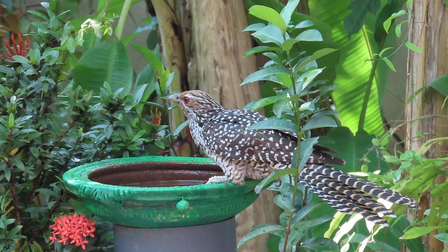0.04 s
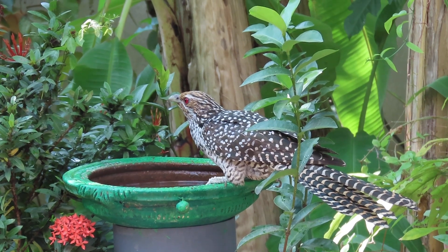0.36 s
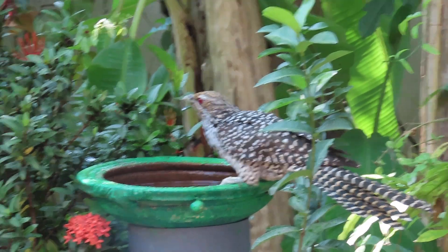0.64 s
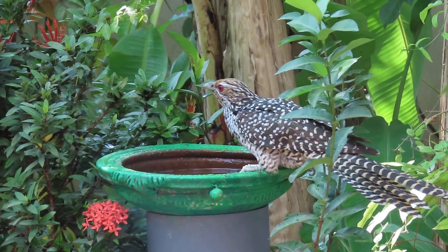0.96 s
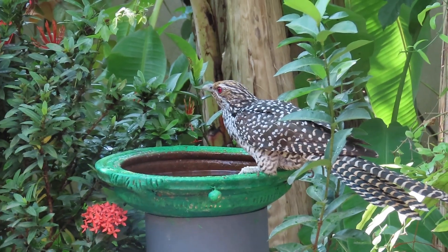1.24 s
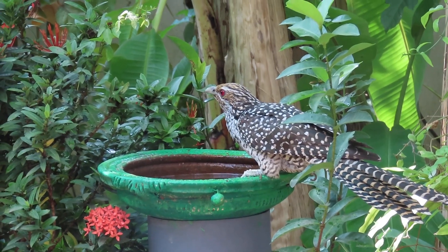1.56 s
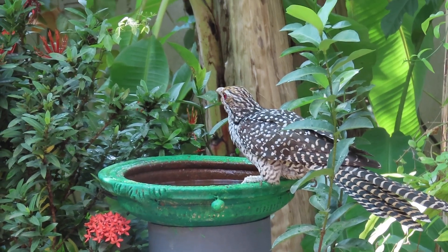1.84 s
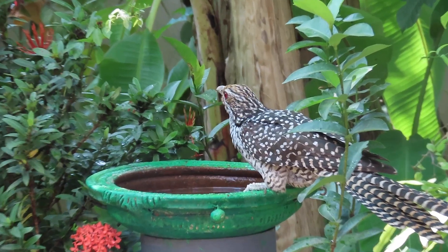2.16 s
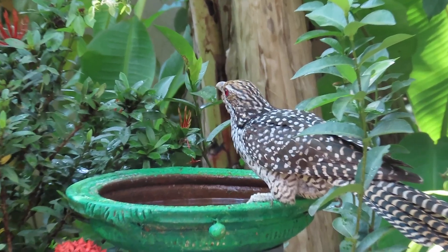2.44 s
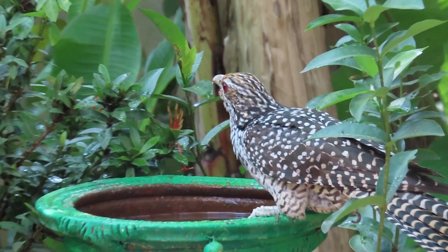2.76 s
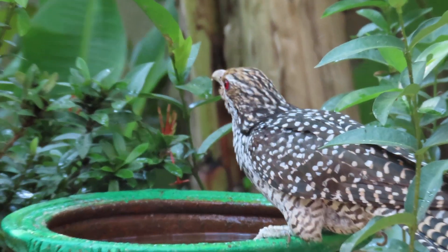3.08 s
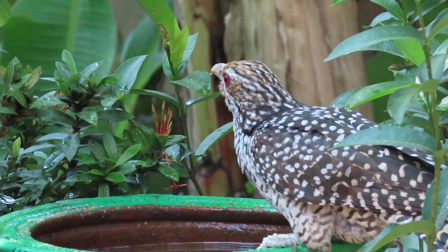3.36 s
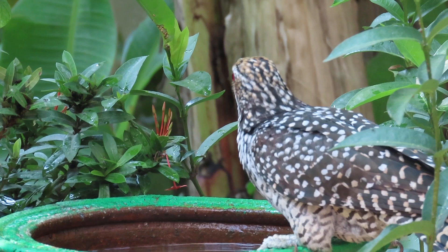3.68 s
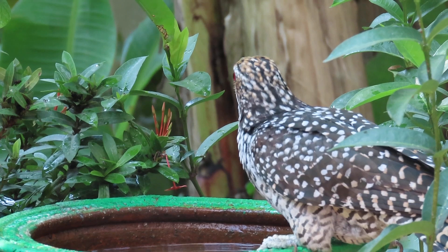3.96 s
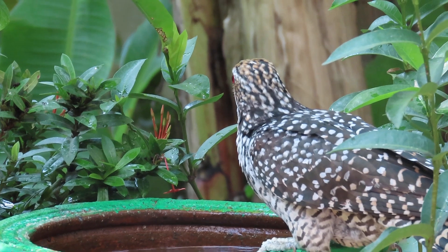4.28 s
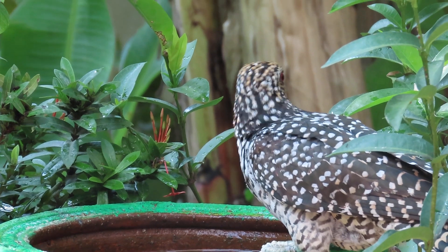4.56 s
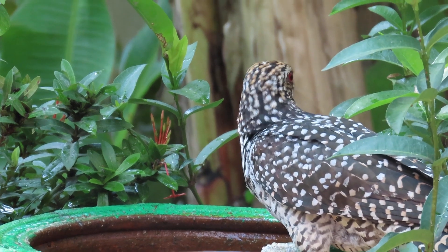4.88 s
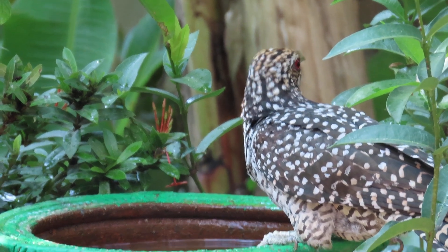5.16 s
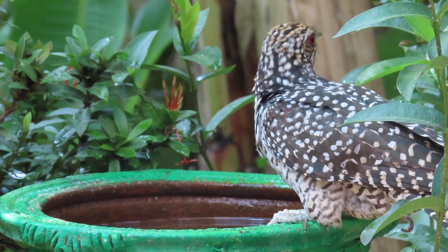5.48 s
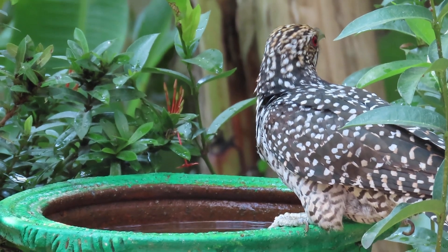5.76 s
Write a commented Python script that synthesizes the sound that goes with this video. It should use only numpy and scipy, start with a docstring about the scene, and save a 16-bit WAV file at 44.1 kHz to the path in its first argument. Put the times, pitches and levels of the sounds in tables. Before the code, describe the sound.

Over the low rumble of a far-off town, a nearby bird lets out a quick series of six raspy, high squawks, followed by three rougher croaks that slide downward. In the pause that follows, there are light ticks and rustles of foliage and a very faint, brief whine from a camera lens motor. Three more squawks come at the end, echoing slightly around the garden.

```python
"""In a walled garden, a koel on a bird bath squawks six times, croaks three times, pauses and calls again.
Each squawk is a rough whistle from the two sides of the syrinx, with a rasp of turbulent air; in the
croaks the vibration turns hoarse and slides down through the throat's resonances. The walls echo.
Foliage ticks and rustles, a distant town rumbles throughout, and a lens motor briefly whines."""
import sys
import numpy as np
from scipy import signal
from scipy.fft import rfft, irfft
from scipy.io import wavfile

SR = 44100
rng = np.random.default_rng(int(sys.argv[2]) if len(sys.argv) > 2 else 0)


def dump_mix(stems):
    """Bounce the given channels to the path in sys.argv[1] as a 16-bit WAV at rate SR."""
    frames = np.atleast_2d(stems).T  # one column per channel
    limited = np.clip(frames, -1, 1)  # hard clip at full scale
    pcm = np.round(limited * 32767).astype(np.int16)
    wavfile.write(sys.argv[1], SR, pcm)


N = 261072
TIME, FREQ = np.arange(N) / SR, np.maximum(np.arange(N // 2 + 1) * SR / N, 1)
# Spectrum of air rushing through the throat. Each row: frequency in Hz, relative level in dB.
BREATH_SPECTRUM = [(1200, -15), (1900, 16), (2250, 15), (2550, 3), (3100, 1), (4000, 5), (4550, 12),
                   (5050, 4), (5800, 7), (6700, -1.5), (7300, -1), (8100, -2), (9200, -25), (11500, -4.5),
                   (13200, -8), (15000, -27)]
# Resonances of the foliage. Each row: centre in Hz, width in Hz, relative level in dB.
FOLIAGE_MODES = [(2430, 700, 11), (3210, 450, 3.5), (3746, 520, 5), (5120, 1350, 0), (7400, 1500, -15)]


def squawks(buzz_hz=135, jitter=.0135, onset_db=11, second_ratio=.9):
    """Self-sustained oscillation: the syrinx whistles, and a slower buzz modulates level and pitch."""
    # Each row: start, end and attack in seconds, crest pitch in Hz, its fall as a share, relative crest
    # level and sag in dB, trims of fundamental, overtones and rasp in dB, line spread in Hz,
    # level of the second side of the syrinx in dB.
    calls = [(0.692, 0.808, 0.039, 2197, 0.06, -35, 4.5, 2, 7.5, -8, 190.4, -8),
             (0.932, 1.038, 0.041, 2237, 0.04, -30.5, 5.5, -3, 0, -4, 190, -9),
             (1.145, 1.254, 0.049, 2186, 0.08, -33.5, 6, -3.5, 4.5, 1.5, 221.3, -6),
             (1.364, 1.491, 0.046, 2203, 0.04, -30.5, 2.5, -3, 1.5, -1.5, 209.7, -9),
             (1.776, 1.899, 0.05, 2239, 0.08, -28.5, 5, -2.5, 2, -9.5, 199.9, -12),
             (2.03, 2.186, 0.019, 2117, 0.04, -37.5, -1, -5, 0, -10.5, 120.4, -12),
             (5.122, 5.224, 0.04, 2152, 0.07, -29.5, 7, -1.5, -3, -9.5, 209.8, -9),
             (5.353, 5.467, 0.035, 1904, 0.01, -38.5, 7, -0.5, 0, -9, 110, -8),
             (5.538, 5.676, 0.034, 2123, 0.05, -28.5, 8.5, -3.5, -1.5, -15.5, 189.7, -12.5)]
    # Harmonics above the octave. Each row: multiple of the pitch, level against the octave in dB.
    overtones = [(3, -19.5), (4, -36.5), (5, -32), (6, -34)]
    progress, sounding, held = call_controls(calls)
    _, crest_hz, fall, _, _, low_db, bright_db, air_db, spread_hz, second_db = held
    effort_db, = curves([point for start, end, attack, _, _, db, sag, *_ in calls
                         for point in [(start, db - onset_db), (start + attack, db), (end, db - sag)]])
    gape = np.sin(np.pi * progress)
    buzz = np.sin(phase_of(buzz_hz * (1 + .192 * wander(46.3))))
    phase = phase_of(pitch_arch(progress, crest_hz, fall) * (1 + jitter * wander(180) + .012 * buzz))
    # the fundamental fades under the octave; overtones are brightest while the bill is wide
    fundamental = [(1, low_db - 6 * (progress - .5))]
    upper = [(2, 0)] + [(k, db + bright_db + 5 * (gape - .5)) for k, db in overtones]
    voice = rough_voice(phase, fundamental, spread_hz, chaos=.6)
    voice += rough_voice(phase, upper, 1.1 * spread_hz, chaos=.78)
    # the other side of the syrinx sings a little lower
    second_side = rough_voice(second_ratio * phase, fundamental + upper[:2], spread_hz, chaos=.99)
    whistle = (voice + undb(second_db) * second_side) * unit(1 + .3 * buzz)
    rasp = undb(air_db - .5 + 4 * (progress - .5)) * noise(undb(across(BREATH_SPECTRUM)))
    hiss = undb(air_db / 2 - 22) * gape * noise_band(11800, 3100)
    return (whistle + (rasp + hiss) * puffs()) * undb(effort_db - 3) * sounding


def croaks(attack_s=.03, onset_db=8, jitter=.036, drop_share=.176):
    """Source and filter: hoarse harmonics fall through fixed resonances while puffs ring the gullet."""
    # Each row: start and end in seconds, relative level and sag in dB, upper and lower pitch in Hz,
    # moment of the drop as a share of the call, trims of gullet and rasp in dB.
    calls = [(2.286, 2.424, -33.5, 8, 2038, 1787, 0.54, -7, -8),
             (2.516, 2.661, -35, 12.5, 1891, 1314, 0.52, -2, -7),
             (2.817, 3.007, -38.5, 8, 1636, 1233, 0.42, -5, -8)]
    # Response of the throat in a croak. Each row: frequency in Hz, gain in dB.
    throat = [(1000, -12), (1400, -2.5), (1850, -1), (2500, 4), (3300, 0), (3800, -2.5), (4300, 2.5),
              (4800, -4), (5400, -9.5), (5900, -19), (6800, -12), (7400, -21), (8500, -50), (9700, -35),
              (11300, -21.5), (13000, -33), (15000, -45)]
    # Resonances that ring as the voice breaks up. Each row: centre in Hz, width in Hz, gain in dB.
    gullet_modes = [(3340, 330, 1.5), (4280, 190, 6.5), (4670, 180, 2), (6500, 290, -7.5)]
    progress, sounding, (_, _, high_hz, low_hz, drop_at, gullet_db, air_db) = call_controls(calls)
    effort_db, = curves([point for start, end, db, sag, *_ in calls
                         for point in [(start, db - onset_db), (start + attack_s, db), (end, db - sag)]])
    dropped = .5 + .5 * np.tanh((progress - drop_at) / drop_share)
    pitch_hz = (high_hz + (low_hz - high_hz) * dropped) * (1 + jitter * wander(180))
    harmonics = [(k, 0) for k in range(1, 9)]
    source = rough_voice(phase_of(pitch_hz), harmonics, spread_hz=205, chaos=.92)
    voice = shape(source, undb(across(throat)))
    air = rng.standard_normal(N) * puffs()
    gullet = undb(gullet_db + 3 * (progress + .5)) * unit(shape(air, resonances(gullet_modes)))
    rasp_colour = undb(across(BREATH_SPECTRUM)) * np.sqrt(low_pass(8500))
    rasp = undb(air_db) * unit(shape(air, rasp_colour))
    # an upper resonance of the throat sinks and grows through each croak
    sinking_hz = np.interp(progress, [0, 1], [5250, 4530])
    sinking = undb(-3.5) * progress * moving_resonance(air, sinking_hz, width_hz=390)
    return (voice + sinking + gullet + rasp) * undb(effort_db - 3) * sounding


def rough_voice(phase, partials, spread_hz, chaos):
    """Random modulation: chaos (0-1) broadens the harmonics (multiple, dB) from lines into bands."""
    wander_hz = 500
    warped_time = np.cumsum(np.broadcast_to(spread_hz / wander_hz, N)) / SR
    sidebands = np.interp(warped_time, TIME, wander(wander_hz) + 1j * wander(wander_hz))
    stack = sum(undb(db) * np.exp(1j * round(k) * phase) for k, db in partials)
    return np.imag(stack * (np.sqrt(2 * (1 - chaos ** 2)) + chaos * sidebands))


def pitch_arch(progress, crest_hz, fall, crest_at=.42, scoop=.042):
    """Frequency glide: the pitch scoops up to a rounded crest, then falls steadily."""
    before = np.maximum(1 - progress / crest_at, 0)
    after = np.maximum(progress - crest_at, 0) / (1 - crest_at)
    return crest_hz * (1 - scoop * before ** 2 - fall * after)


def puffs(rate_hz=210, scatter=.35, depth=.65):
    """Amplitude modulation: the slack folds of the syrinx chop the air unevenly."""
    return unit(1 + depth * np.sin(phase_of(rate_hz * (1 + scatter * wander(91)))))


def moving_resonance(x, hz, width_hz):
    """Forced resonance: x drives a narrow band whose centre moves; rms 1."""
    carrier = np.exp(1j * phase_of(hz))
    narrow = signal.butter(2, width_hz / 2, fs=SR, output="sos")
    return unit(np.real(carrier * signal.sosfilt(narrow, x / carrier)))


def call_controls(calls, release_s=.012):
    """Breath gates the voice: gives each call's progress (0-1), its envelope and its held settings."""
    progress, = curves([point for start, end, *_ in calls
                        for point in [(start - .01, 0), (start, 0), (end, 1), (end + .06, 1)]])
    sounding = np.max([gate(start, end, rise=.0058, fall=release_s) for start, end, *_ in calls], axis=0)
    held = curves([(t, *row) for start, end, *row in calls for t in (start - .01, end + .06)])
    return progress, sounding, held


def foliage_knocks(faint_count=30):
    """Impacts in the foliage: clear ones at set times, faint ones scattered at random."""
    # Each row: time in seconds, relative levels of body and treble in dB.
    clear = [(0.3198, -33.5, -74), (0.359, -28, -65), (0.6397, -31.5, -63), (0.9085, -29, -69),
             (1.72, -30.5, -74), (1.7737, -29, -67), (2.142, -29.5, -62), (3.2, -38.5, -74),
             (3.26, -37.5, -72), (3.469, -34, -61), (3.5097, -33.5, -65), (3.587, -31, -64),
             (3.7788, -31.5, -70), (3.8451, -38, -71), (3.8786, -43, -71), (4.07, -30, -59),
             (4.3375, -32.5, -70), (4.378, -32, -69), (4.4702, -43, -69), (4.4942, -37.5, -67),
             (4.628, -33.5, -73), (4.6693, -37, -72), (4.6992, -39, -59), (4.7256, -38, -68),
             (4.7615, -36.5, -71), (4.862, -35, -76), (4.8883, -30.5, -63), (4.9714, -37.5, -59),
             (5.0712, -33, -88), (5.8152, -32.5, -73)]
    times = rng.uniform(0, N / SR, (faint_count, 1))
    levels_db = [-42, -70] + 1.5 * rng.standard_normal((faint_count, 2))
    return np.vstack([clear, np.hstack([times, levels_db])])


def ticks(knocks, hold_s=.006):
    """Impact excitation: each knock stirs the foliage's modes in its own proportions."""
    stir = undb(1.5 * rng.standard_normal((len(knocks), len(FOLIAGE_MODES))))
    blows = np.array([undb(db) * gate(t, t + hold_s, rise=.0017, fall=.012) for t, db, _ in knocks])
    rings = np.array([undb(db) * noise_band(hz, width) for hz, width, db in FOLIAGE_MODES])
    return undb(-10) * np.sum((stir.T @ blows) * rings, axis=0) / np.std(rings.sum(axis=0))


def snaps(knocks):
    """A brief impact is broadband: the thin top of each tick, different left and right."""
    bursts = sum(undb(db) * gate(t, t + .001, rise=.001, fall=.011) for t, _, db in knocks)
    return bursts * np.array([noise_band(11100, 9700) for _ in range(2)])


def rustle(patchy_db=2.2):
    """Friction noise: leaves brush in soft, uneven patches."""
    # Each row: time in seconds, relative level in dB.
    brushing = [(0, -69), (.28, -57), (.36, -53.5), (.5, -64), (1.6, -50), (2.2, -54), (3.4, -69),
                (3.5, -52), (3.7, -81), (3.83, -54), (4, -82), (4.3, -68), (4.42, -68), (4.57, -67),
                (4.75, -64), (4.95, -58), (5.05, -67), (5.9, -53.5)]
    level_db, = curves(brushing)
    return undb(level_db - 1 + patchy_db * wander(30)) * noise(resonances(FOLIAGE_MODES))


def garden(x, t60_s=.56, tail_db=-8, damp_hz=7500):
    """Reflection and scattering: direct sound, hard echoes and a duller diffuse tail, in stereo."""
    # Colour of the diffuse tail. Each row: frequency in Hz, gain in dB.
    tail_colour = [(1000, 2), (2100, -1.5), (3000, -1.5), (4450, 1), (5200, -2), (7000, -4), (12000, -10)]
    # Reflections from trunks and walls. Each row: delay in seconds, gain in dB.
    echoes = [(.0075, -5.5), (.023, -5.5), (.071, -7.5), (.135, -13)]
    # Phase between the microphone ports. Each row: frequency in Hz, lead of the left in radians.
    port_phase = [(1000, 0), (4400, .25), (6500, .5), (9000, .6), (11500, 1.9), (15000, 2.8)]
    decay = undb(tail_db) * unit((1 - np.exp(-TIME / .0004)) * undb(-60 * TIME / t60_s))
    tail_mid, tail_side = rfft(rng.standard_normal((2, N)) * decay / np.sqrt(N))
    reflections = sum(undb(db) * np.exp(-2j * np.pi * FREQ * delay) for delay, db in echoes)
    # leaves absorb the treble; the ports differ more as waves get shorter
    damping = np.sqrt(low_pass(damp_hz))
    mid = 1 + damping * (tail_mid * undb(across(tail_colour)) + reflections)
    side = damping * tail_side * np.minimum(FREQ / 4200, 1.3)
    turn = np.exp(.5j * across(port_phase))
    responses = irfft([mid * turn + side, mid / turn - side], N)
    lead = 64  # samples of room for the earlier arrival
    responses = np.roll(responses, lead, axis=1)[:, :SR]
    return signal.fftconvolve(x[None], responses, axes=1)[:, lead:lead + N]


def town(level_db=-38, low_hz=70, upper_hz=800):
    """Superposition: far sources merge into a broad rumble, with the drones of machines in it."""
    # Spectrum of the rumble. Each row: frequency in Hz, relative spectral density in dB.
    spectrum = [(15, -35), (25, -23), (53, -9), (75, -3.5), (101, -12), (160, -1.5), (240, -2.5), (305, -3),
                (648, -10), (919, -9), (1750, -16.5), (3830, -27.5), (4500, -31.5), (5010, -34.5),
                (15500, -53.5)]
    # Stereo width. Each row: frequency in Hz, side minus mid in dB.
    stereo_width = [(60, -26), (110, -14), (200, -17.5), (380, -13), (700, -15.5), (1290, -15.5),
                    (2380, -8.5), (4400, -9), (8120, -3.5), (15000, 2)]
    # Drones of far machines. Each row: centre in Hz, width in Hz, relative level in dB.
    machines = [(43.7, 5.3, -50.5), (110.7, 16, -48.5), (167.3, 42, -48.5), (349, 145, -45),
                (494.2, 11.4, -54.5), (918.6, 30, -53.5)]
    mid, side = (undb(level_db) * noise(undb(across(spectrum))) for _ in range(2))
    side = shape(side, undb(across(stereo_width)))
    stereo = np.array([mid + side, mid - side])
    low = low_pass(low_hz)
    upper = (1 - low_pass(upper_hz)) * low_pass(5000)
    gains = background_levels()
    rumble = sum(shape(stereo, band) * gain for band, gain in zip([low, 1 - low - upper, upper], gains))
    drones = sum(undb(db) * noise_band(hz, width) * gains[int(hz > low_hz)] for hz, width, db in machines)
    return rumble + drones


def background_levels(drop_from_s=2.23, drop_to_s=3.44, flicker_db=.5):
    """Gains of three bands: the low rumble swells; the upper background drops as the camera zooms."""
    # Swell of the low rumble. Each row: time in seconds, gain in dB.
    low_swell = [(0, 2.5), (2.3, 1.5), (3.3, 6.5), (4.1, 1.5), (4.6, 4), (5.9, 4.5)]
    low_db, = curves(low_swell)
    # the camera's noise suppression, as a cut at set times
    cut_db, = curves([(drop_from_s - .05, 0), (drop_from_s, -5), (drop_to_s, -5), (drop_to_s + .05, 0)])
    return [undb(db + flicker_db * wander(9)) for db in (low_db, .23, .26 + cut_db)]


def lens_motor(width_hz=80):
    """Narrow-band noise: a small motor in the camera whines in two thin, wavering lines."""
    # Each row: time in seconds, level in dB.
    running = [(3.15, -100), (3.28, -68), (3.4, -79), (3.5, -67), (3.62, -66.5), (3.75, -73), (3.95, -95)]
    # Each row: frequency in Hz, relative level in dB.
    lines = [(8064, -3), (12040, -8.5)]
    whine = resonances([(hz, width_hz, db) for hz, db in lines])
    return undb(curves(running)[0]) * np.array([noise(whine), noise(whine)])


def undb(db):
    """Decibels to amplitude ratio."""
    return 10 ** (np.asarray(db) / 20)


def unit(x):
    """Normalise to rms 1."""
    return x / np.sqrt(np.mean(x ** 2))


def phase_of(hz):
    """Phase in radians is the integral of frequency."""
    return 2 * np.pi * np.cumsum(hz) / SR


def curves(rows):
    """Interpolate the columns of a time table at every sample."""
    times, *columns = np.transpose(rows)
    return [np.interp(TIME, times, column) for column in columns]


def across(points):
    """Interpolate a (Hz, value) table at every bin, along log frequency."""
    hz, value = np.transpose(points)
    return np.interp(np.log(FREQ), np.log(hz), value)


def gate(start, end, rise, fall):
    """Linear rise up to start, exponential decay after end; all in seconds."""
    envelope = np.zeros(N)
    near = slice(*np.searchsorted(TIME, [start - rise, end + 10 * fall]))
    opening = np.minimum((TIME[near] - start) / rise + 1, 1)
    envelope[near] = opening * np.exp(-np.maximum(TIME[near] - end, 0) / fall)
    return envelope


def shape(x, gain):
    """Filtering multiplies the spectrum by a gain per bin."""
    return irfft(rfft(x) * gain, N)


def low_pass(hz):
    """Gain of a fourth-order roll-off above hz."""
    return 1 / (1 + (FREQ / hz) ** 4)


def resonances(modes):
    """Summed gain of steep-sided resonances (centre Hz, width Hz, dB)."""
    return sum(undb(db) / (1 + ((FREQ ** 2 - hz ** 2) / (FREQ * width)) ** 2) for hz, width, db in modes)


def noise(gain):
    """Gaussian noise of rms 1 with the given spectrum, from the lowest bin up."""
    bins = rng.standard_normal(len(gain)) + 1j * rng.standard_normal(len(gain))
    return unit(irfft(gain * bins, N))


def noise_band(hz, width_hz):
    """Noise through one resonance; rms 1."""
    return noise(resonances([(hz, width_hz, 0)]))


def wander(hz):
    """Low-passed noise: smooth random motion, mostly slower than hz."""
    return noise(low_pass(hz)[FREQ < 6 * hz])


def scene():
    """Pressures add: bird and foliage in the garden, over the town and the motor."""
    knocks = foliage_knocks()
    nearby = squawks() + croaks() + ticks(knocks) + rustle()
    return garden(nearby) + snaps(knocks) + town() + lens_motor()


def record(dry, top_hz=15300):
    """Band limiting: a steep low-pass cuts the highest treble."""
    return signal.sosfilt(signal.ellip(10, .1, 80, top_hz, fs=SR, output="sos"), dry)


dry = scene()
out = record(dry)
dump_mix(out)
```